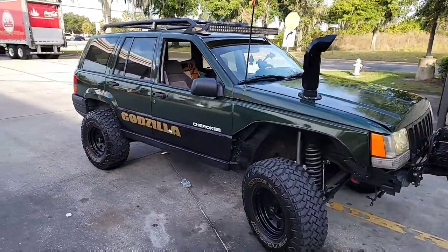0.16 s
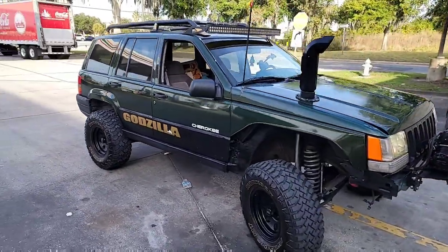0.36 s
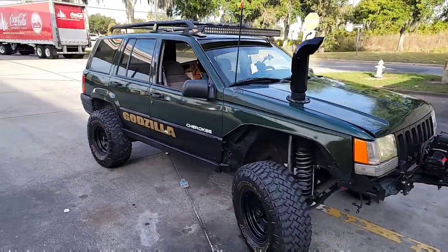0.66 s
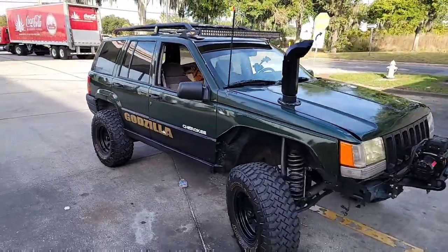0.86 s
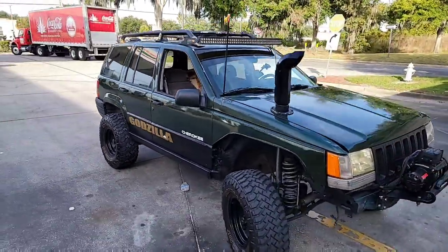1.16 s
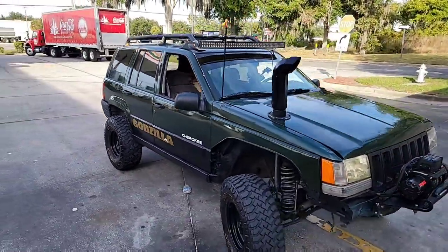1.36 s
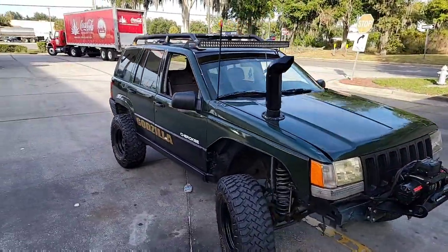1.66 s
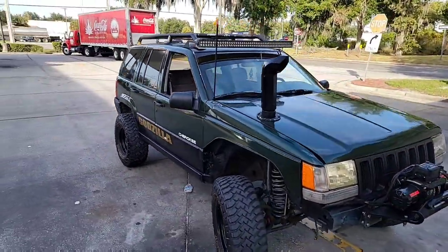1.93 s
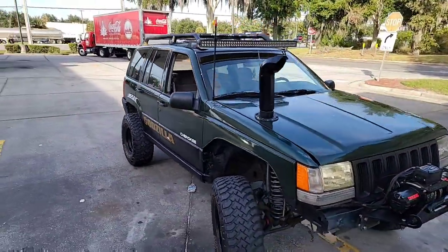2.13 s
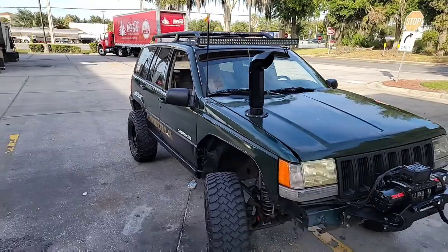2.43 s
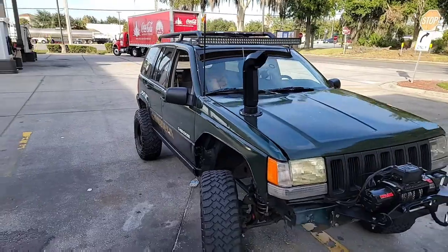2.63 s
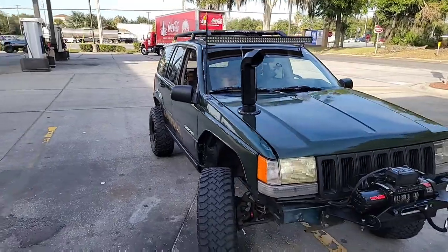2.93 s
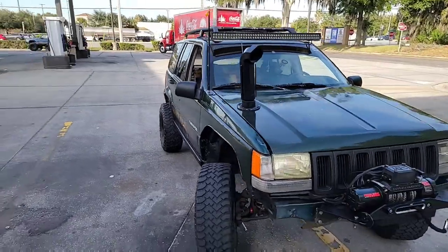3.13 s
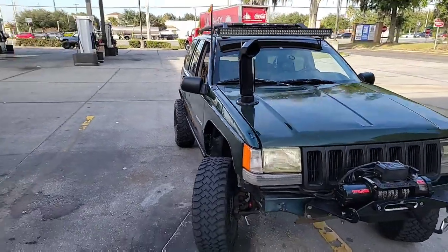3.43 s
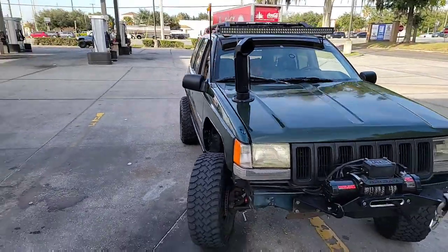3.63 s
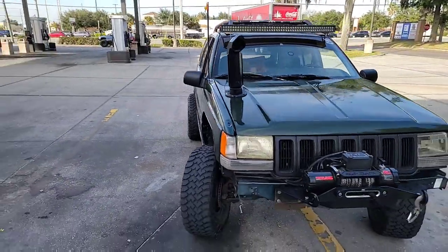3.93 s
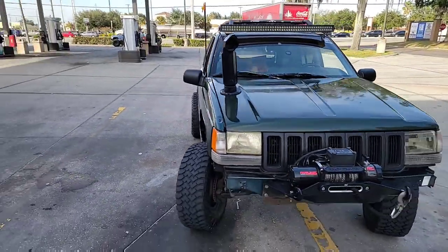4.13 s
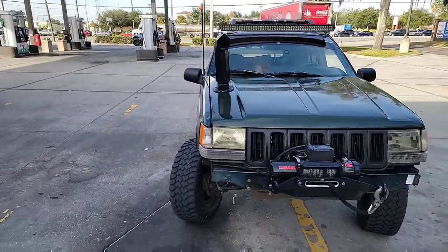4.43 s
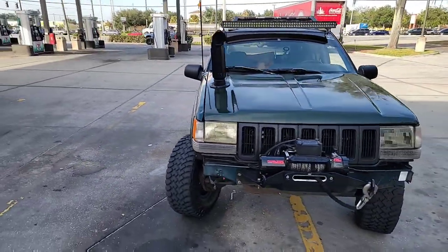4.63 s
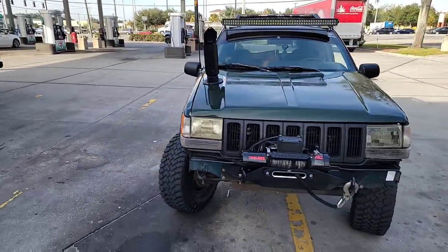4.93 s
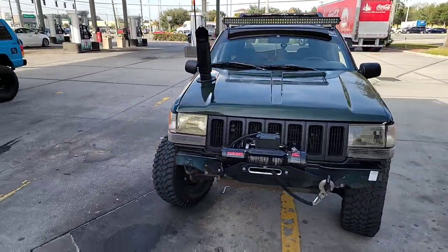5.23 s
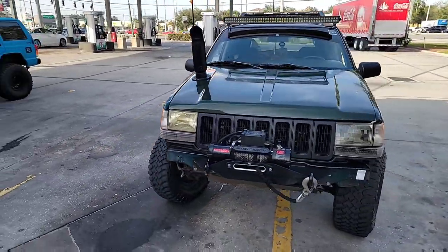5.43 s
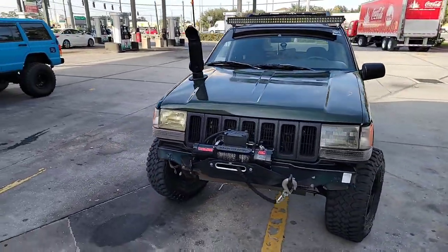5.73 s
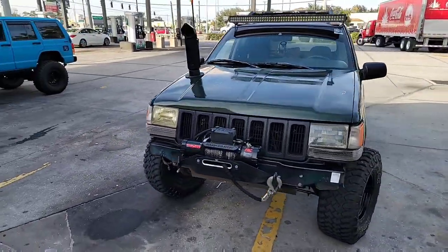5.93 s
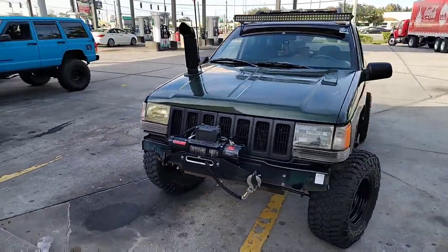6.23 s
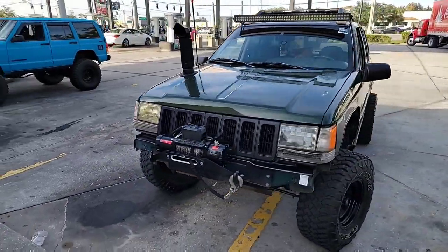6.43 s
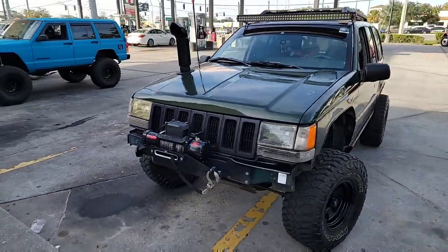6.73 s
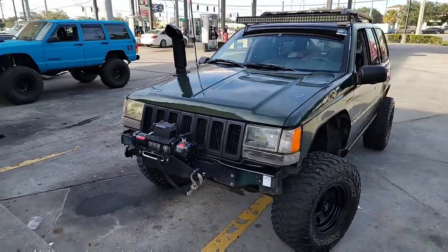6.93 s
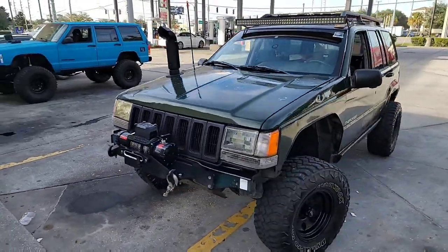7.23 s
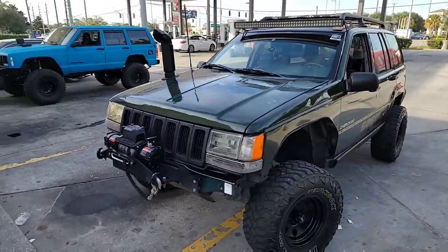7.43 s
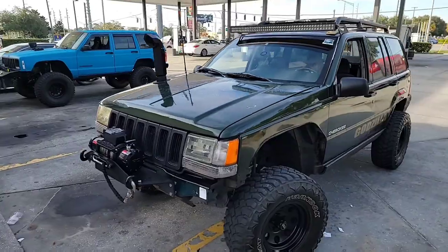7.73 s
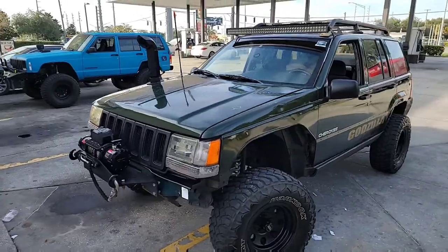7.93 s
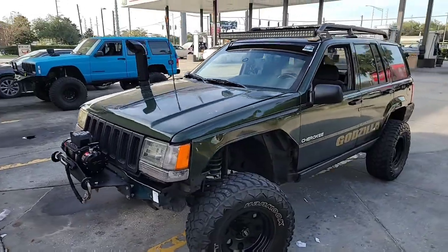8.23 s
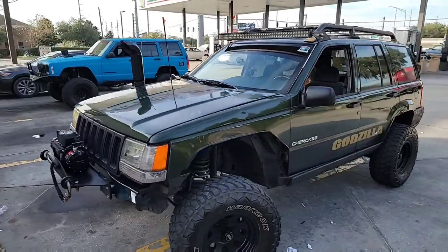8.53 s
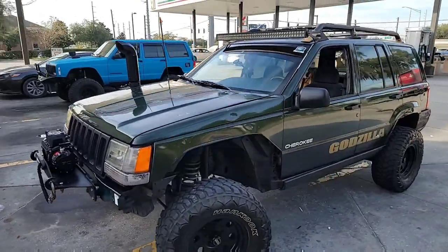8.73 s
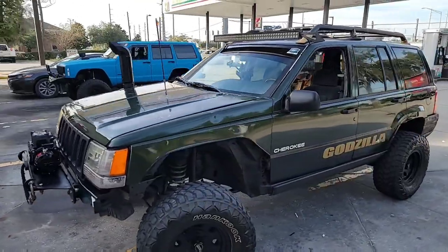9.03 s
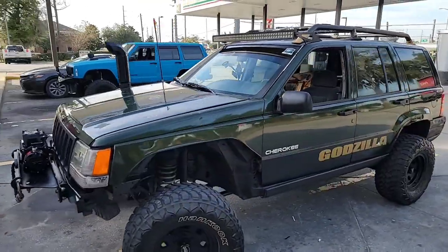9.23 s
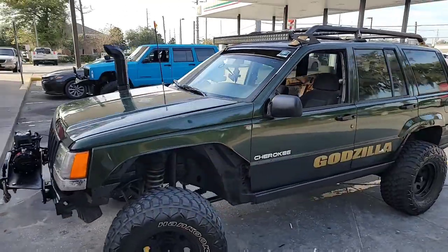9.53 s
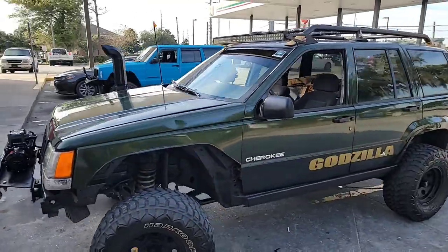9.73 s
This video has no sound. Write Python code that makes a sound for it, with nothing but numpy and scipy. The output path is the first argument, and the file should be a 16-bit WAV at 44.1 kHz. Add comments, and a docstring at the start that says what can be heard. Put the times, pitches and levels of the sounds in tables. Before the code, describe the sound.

Heard up close on a walk around its nose, a large off-roader idles outdoors with a deep, burbling rumble, light fan whirr and faint valve ticks. A distant brake gives a faint, very high squeal, then a couple of air puffs. Toward the end another engine gives two quick revs and holds a low growl over the idle. There are two brief dropouts, one at the start and one near the end.

```python
"""Walk round an idling off-roader.

A lifted six-cylinder idles in an open lot while a two-port microphone is carried round its nose.
The tailpipe booms at twice the firing rate over a burble of gas; the bay whirrs, hisses and ticks.
A thin squeal, as of a distant brake, ends in puffs of air. Late on, a second engine blips nearby
and growls on. Twice the sound cuts out."""
import sys
import numpy as np
from scipy import signal
from scipy.fft import rfft, irfft, next_fast_len
from scipy.io import wavfile

SR = 44100
rng = np.random.default_rng(int(sys.argv[2]) if len(sys.argv) > 2 else 0)


def output_pcm(signal):
    """Save a mono or channel-first signal as 16-bit PCM at the path in sys.argv[1].

    Samples are clipped to [-1, 1] before scaling.
    """
    pcm = np.clip(np.atleast_2d(signal).T, -1, 1) * 32767
    wavfile.write(sys.argv[1], SR, np.round(pcm).astype(np.int16))


N = 435266
TIME = np.arange(N) / SR
LEFT_RIGHT = np.array([[.5], [-.5]])  # splits a difference between the ports


def from_db(db):
    """Decibels to gain."""
    return 10 ** (np.asarray(db) / 20)


def rms_one(x):
    """Scale to rms 1."""
    return x / np.sqrt(np.mean(x ** 2) + 1e-20)


def in_time(rows):
    """A curve table's value columns at every sample."""
    times, *columns = np.transpose(rows)
    return [np.interp(TIME, times, column) for column in columns]


def at_hz(points, hz):
    """Read a spectrum on a log-frequency axis."""
    known_hz, values = np.transpose(points)
    return np.interp(np.log(hz + 1), np.log(known_hz), values)


def since(start_s):
    """Seconds since start_s, zero before."""
    return np.maximum(TIME - start_s, 0)


def envelope(start_s, length_s, attack_s, sag_db_per_s, release_s):
    """Gain that rises, sags while held, then dies away."""
    age = since(start_s)
    held = np.minimum(age / attack_s, 1) * from_db(-sag_db_per_s * np.minimum(age, length_s))
    return held * np.exp(-since(start_s + length_s) / release_s)


def drift(rate_hz):
    """Slow random wander, rms 1."""
    pole = np.exp(-200 * np.pi * rate_hz / SR)
    white = rng.standard_normal(N // 100 + 1002)
    slow = signal.lfilter([1], [1, -2 * pole, pole * pole], white)[1000:]
    return np.interp(np.arange(N) / 100, np.arange(len(slow)), rms_one(slow))


def arrive(x, lead_s):
    """The left port hears x lead_s sooner than the right."""
    left, right = np.broadcast_to(x, (2, N))
    return np.array([np.interp(TIME + lead_s / 2, TIME, left), np.interp(TIME - lead_s / 2, TIME, right)])


# Sound coming straight to both ports: freq_hz, power_share
DIRECT_SHARE = [(60, .98), (170, .93), (330, .75), (600, .6), (1200, .5), (2500, .38), (10000, .2)]

def noise(spectrum, skirt_db_per_octave=12):
    """Coloured stereo noise, mid rms 1: a common direct part plus scatter at each port."""
    size = next_fast_len(N, True)
    hz = np.arange(size // 2 + 1) * SR / size + 1
    white = rfft(rng.standard_normal((3, size)))
    direct = np.clip(at_hz(DIRECT_SHARE, hz), 0, 1)
    ports = np.sqrt(direct) * white[0] + np.sqrt(1 - direct) * white[1:]
    octaves_outside = np.abs(np.log2(hz / np.clip(hz, spectrum[0][0], spectrum[-1][0])))
    colour = from_db(at_hz(spectrum, hz) - skirt_db_per_octave * octaves_outside)
    out = irfft(ports * colour, size)[:, :N]
    return out / np.std(out.mean(axis=0))


def strokes(firings, cylinder_db, rise, fall, scatter_db=1.5):
    """One burst per firing, as strong as its cylinder; rise and fall in firing periods."""
    index, age = np.floor(firings).astype(int), firings % 1
    strength_db = cylinder_db[index % len(cylinder_db)] + scatter_db * rng.standard_normal(4096)[index]
    return rms_one(from_db(strength_db) * (1 - np.exp(-age / rise)) * np.exp(-age / fall))


def throb(bursts, share):
    """Gain that puts this share of a noise's power in bursts."""
    return np.sqrt(1 - share + share * bursts ** 2)


def standing_wave(place_m, crest_db, node_db, node_m, spacing_m, loss_db_per_m):
    """Gain of a tone meeting its reflection: broad crests, evenly spaced nodes."""
    swing = np.sin(np.pi * (place_m - node_m) / spacing_m)
    return np.hypot(from_db(crest_db) * swing, from_db(node_db)) * from_db(-loss_db_per_m * place_m)


PORT_GAP_M = .16
BOOM_WAVE = dict(crest_db=-11, node_db=-24, node_m=1.5, spacing_m=3.0, loss_db_per_m=.73)
THIRD_WAVE = dict(crest_db=-27, node_db=-39, node_m=1.71, spacing_m=1.61, loss_db_per_m=1.23)
# Weaker pipe tones: firing_multiple, relative_db
PIPE_OVERTONES = [(1, -5.5), (1.5, -17.5), (2.5, -8.5), (3.5, -7), (4, -6.5), (5, -9.5), (6, -15.5),
                  (7, -16.5)]

def tailpipe(firings, walked_m, burble_db):
    """The pipe rings at 2 and 3 times the firing rate; weaker tones waver as combustion varies."""
    turn = 2 * np.pi * firings
    ports_m = walked_m - PORT_GAP_M * LEFT_RIGHT
    boom = standing_wave(ports_m, **BOOM_WAVE) * from_db(.45 * drift(13)) * np.sin(2 * turn)
    third_gain = standing_wave(ports_m, **THIRD_WAVE) * from_db(drift(1.5))
    third = third_gain * np.sin(3 * turn + .67 * drift(1.9))
    overtones = 0
    for multiple, db in PIPE_OVERTONES:
        phase = multiple * turn + 2 * np.pi * rng.random()
        overtones += from_db(db + 3.1 * drift(3.1)) * np.sin(phase + .72 * drift(17))
    return np.sqrt(2) * (boom + third + from_db(burble_db) * overtones)


# Cylinder strengths in firing order: puff_db, tick_db
CYLINDERS = [(-2, 5), (-1, -5), (0, 1), (1, .5), (2.5, -7), (0, -1.5)]
# Exhaust gas spectrum: freq_hz, density_db
GAS_SPECTRUM = [(18, -21.5), (32, -14), (55, -3.5), (85, -1), (145, 0), (200, -5), (290, -21), (600, -20.5)]
# Block rumble spectrum: freq_hz, density_db
BLOCK_SPECTRUM = [(170, -12.5), (260, 4.5), (330, 0.5), (430, -2.5), (600, -8), (850, -9), (1600, -30.5)]

def burble(firings, burble_db, block_db):
    """Each firing pushes turbulent gas out of the pipe and shakes the block."""
    puffs = strokes(firings, np.array(CYLINDERS)[:, 0], rise=.081, fall=.54)
    gas = from_db(burble_db + 1.5) * throb(puffs, share=.34) * noise(GAS_SPECTRUM)
    block = from_db(block_db - 1.6 + .98 * drift(11)) * throb(puffs, share=.37) * noise(BLOCK_SPECTRUM)
    return gas + block


def ground_echo(x, delay_s=.0036, gain=.22):
    """The paving reflects the sound by a slowly wandering path."""
    late = TIME - delay_s * (1 + .09 * drift(.406))
    echo = np.array([np.interp(late, TIME, port) for port in x])
    return (x + gain * echo) / np.sqrt(1 + gain ** 2)


# Fan and belt spectrum: freq_hz, density_db
WHIRR_SPECTRUM = [(300, -12.5), (550, -7.5), (800, 1.5), (1100, 1.5), (1600, -1), (2400, -5), (3500, -6),
                  (4800, -16), (7000, -24)]
# Intake spectrum: freq_hz, density_db
HISS_SPECTRUM = [(2500, -12), (4500, 0), (5600, -1), (6700, -3.2), (7900, -1.5), (9500, -5.5), (11500, -9),
                 (15500, -13)]
# Valve spectrum: freq_hz, density_db
TICK_SPECTRUM = [(4000, -12), (8000, -9), (11000, -7), (12400, -3), (13500, 0), (15500, -.5)]

def engine_bay(firings, bay_db, tick_db):
    """Fan and belts whirr, the intake hisses, each cylinder's valves tick."""
    ticks = strokes(firings, np.array(CYLINDERS)[:, 1], rise=.04, fall=.6)
    whirr = from_db(bay_db + 1.66 + .87 * drift(16)) * throb(ticks, share=.035) * noise(WHIRR_SPECTRUM)
    hiss = from_db(bay_db - 7.5) * noise(HISS_SPECTRUM)
    valves = from_db(tick_db) * throb(ticks, share=.65) * noise(TICK_SPECTRUM)
    return ground_echo(whirr + hiss + valves)


DRONE_START_S, DRONE_HZ, DRONE_RISE_HZ_PER_S, DRONE_DB = .45, 413, 17, -44
# Pulley hums: pitch_hz, level_db
PULLEY_HUMS = [(422, -58), (508, -60), (634, -58.5)]

def belt_drive():
    """Pulleys hum faintly and unsteadily; one drones for a moment."""
    hums = sum(from_db(db + 2 * drift(2)) * np.sin(2 * np.pi * hz * TIME + .9 * drift(2))
               for hz, db in PULLEY_HUMS)
    gain = envelope(DRONE_START_S, length_s=.62, attack_s=.35, sag_db_per_s=.5, release_s=.35)
    gain *= from_db(DRONE_DB + 2.5 * drift(20))
    drone_hz = DRONE_HZ + DRONE_RISE_HZ_PER_S * since(DRONE_START_S) + 20 * drift(25)
    drone = gain * np.sin(2 * np.pi * np.cumsum(drone_hz) / SR)
    return np.sqrt(2) * (hums + drone)


# Thin squeals: start_s, length_s, pitch_hz, level_db
SQUEALS = [(5.5, 0.073, 11630, -57), (5.62, .18, 11920, -70), (5.807, .08, 11790, -62),
           (5.996, .36, 11635, -60), (7.88, .08, 11605, -70)]

def brake_squeal():
    """A high, broken tone that wavers in pitch and level."""
    waver_hz, flutter = 14 * drift(68), from_db(3.8 * drift(25))
    squeal = 0
    for start, length, hz, db in SQUEALS:
        gain = from_db(db) * envelope(start, length, attack_s=.016, sag_db_per_s=5, release_s=.04)
        squeal += gain * np.sin(2 * np.pi * np.cumsum(hz + waver_hz) / SR)
    return np.sqrt(2) * flutter * squeal


# Air releases: start_s, length_s, level_db
AIR_PUFFS = [(6.337, .035, -44.5), (6.606, .06, -55)]
# Released air spectrum: freq_hz, density_db
AIR_SPECTRUM = [(900, -24), (1800, 14), (3500, 7), (8000, 0), (13000, -24)]

def air_puffs():
    """Air escapes in short puffs as the squeal stops."""
    gain = sum(from_db(db) * envelope(start, length, attack_s=.018, sag_db_per_s=33, release_s=.018)
               for start, length, db in AIR_PUFFS)
    return gain * noise(AIR_SPECTRUM)


# Second engine's blips: start_s, length_s, firing_hz, climb_hz_per_s, pulse_db, roar_db
BLIPS = [(7.627, 0.14, 80, 50, -22, -45), (7.872, 0.23, 88.6, 189, -23, -33.5)]
# Exhaust pulse harmonics: firing_multiple, relative_db
PULSE_HARMONICS = [(1, 2.5), (2, -11.5), (3, -24), (4, -32)]
# Exhaust roar spectrum: freq_hz, density_db
ROAR_SPECTRUM = [(35, -5), (60, -1), (110, 0), (190, 0), (260, -2), (380, -4.5), (600, -13), (1100, -21)]

def throttle_blips():
    """A second engine's uneven pulses quicken as its throttle opens, carrying a low roar."""
    gas = from_db(2 * drift(9.7)) * noise(ROAR_SPECTRUM)
    out = 0
    for start, length, start_hz, climb, pulse_db, roar_db in BLIPS:
        firing_hz = (start_hz + climb * since(start)) * (1 + .047 * drift(25))
        turn = 2 * np.pi * np.cumsum(firing_hz) / SR
        pulses = sum(from_db(db + 4.4 * drift(22)) * np.cos(k * turn) for k, db in PULSE_HARMONICS)
        roar = from_db(roar_db) * (1 + .55 * np.cos(turn)) * gas
        gain = envelope(start, length, attack_s=.028, sag_db_per_s=37.5, release_s=.1)
        out += gain * (np.sqrt(2) * from_db(pulse_db) * pulses + roar)
    return out


# Growl loudness: time_s, level_db
GROWL_LEVEL = [(7.84, -77.5), (7.89, -31), (8.3, -35), (8.7, -30.5), (8.82, -26), (9.1, -33), (9.8, -34)]
# Growl spectrum: freq_hz, density_db
GROWL_SPECTRUM = [(35, -2.5), (130, -1.5), (190, 1), (260, -0.5), (380, -7.5), (600, -15.5), (1200, -24),
                  (3000, -33), (6000, -42)]

def growl(pulse_hz=129.5):
    """The second engine pulls hard: low noise throbbing at its pulse rate."""
    turn = 2 * np.pi * np.cumsum(pulse_hz * (1 + .04 * drift(10))) / SR
    gain = from_db(in_time(GROWL_LEVEL)[0] + 1.8 * drift(11))
    return gain * (1 + .4 * np.cos(turn)) * noise(GROWL_SPECTRUM)


IDLE_FIRING_HZ = 37.35
PIPE_EXTRA_LEAD_S, SECOND_ENGINE_LEAD_S = .00025, -.00036  # positive = left
# Microphone path: time_s, walked_m
WALK = [(0.4, 0.35), (1.3, 0.77), (2.5, 0.91), (3.65, 1.46), (4.5, 2.21), (5.7, 3.05), (7.0, 3.98),
        (7.65, 4.46), (8.5, 5.14), (9.8, 6.0)]
# Base level of whirr and hiss: time_s, level_db
BAY_LEVEL = [(0.4, -46.5), (1.5, -44), (2.3, -45), (4.4, -45), (5.4, -47.2), (7.4, -49)]
# Valve ticks, shaded and uncovered by the body: time_s, level_db
TICK_LEVEL = [(0.6, -53), (3.4, -57.5), (4.5, -56.5), (6.2, -64.5), (8.2, -59.5), (9.8, -69)]
# Base levels of the low sounds: time_s, burble_db, block_db
RUMBLE_LEVELS = [(0.4, -34.5, -38.5), (1.4, -36.5, -40), (2.5, -31.5, -37), (3.6, -32, -42),
                 (4.7, -33.5, -39), (6.3, -35, -43.5), (7.6, -34, -43)]
# Direction of the bay: time_s, left_lead_s, left_minus_right_db
BAY_BEARING = [(3.5, .00047, -0.8), (7.0, 0.000272, -3), (9.8, .0002, -6.5)]

def scene():
    """One idle drives pipe, block and bay; the walk sets their mix. Brake and second engine join."""
    (walked_m,), (bay_db,), (tick_db,) = in_time(WALK), in_time(BAY_LEVEL), in_time(TICK_LEVEL)
    burble_db, block_db = in_time(RUMBLE_LEVELS)
    lead_s, pan_db = in_time(BAY_BEARING)
    firing_hz = IDLE_FIRING_HZ * (1 + .0023 * drift(3.2))  # the idle hunts a little
    firings = np.cumsum(firing_hz) / SR
    exhaust = arrive(tailpipe(firings, walked_m, burble_db), lead_s + PIPE_EXTRA_LEAD_S)
    bay = engine_bay(firings, bay_db, tick_db) * from_db(pan_db * LEFT_RIGHT)
    engine = arrive(bay + belt_drive() + burble(firings, burble_db, block_db), lead_s)
    second_engine = arrive(throttle_blips() + growl(), SECOND_ENGINE_LEAD_S)
    return exhaust + engine + second_engine + brake_squeal() + air_puffs()


CUTOFF_HZ, FADE_IN_S = 15600, .01
# Port imbalance: freq_hz, left_minus_right_db
PORT_TILT = [(500, -0.14), (2800, 3.5), (5500, 2.5), (9500, 5.5), (14000, 11)]
# Dropouts: start_s, end_s, closing_s
DROPOUTS = [(0.1645, 0.367, .00003), (8.8307, 9.034, .0002)]

def record(dry):
    """The left port is brighter; the sound twice cuts out and fades back; the top is cut."""
    size = next_fast_len(N + SR // 10, True)
    tilt_db = at_hz(PORT_TILT, np.arange(size // 2 + 1) * SR / size)
    out = irfft(rfft(dry, size) * from_db(tilt_db * LEFT_RIGHT), size)[:, :N]
    for start, end, closing in DROPOUTS:
        out *= np.clip((start - TIME) / closing, 0, 1) + np.clip((TIME - end) / FADE_IN_S, 0, 1)
    return signal.sosfilt(signal.ellip(12, .1, 90, CUTOFF_HZ, fs=SR, output="sos"), out)


dry = scene()
out = record(dry)
output_pcm(out)
```